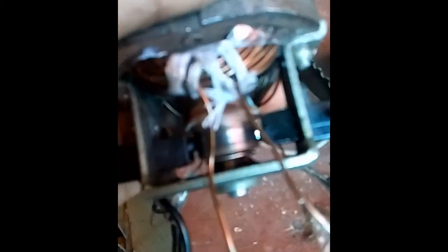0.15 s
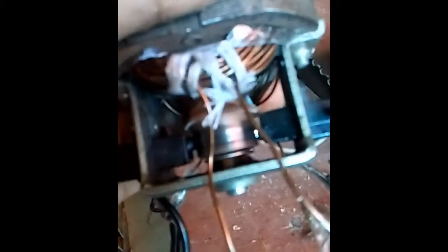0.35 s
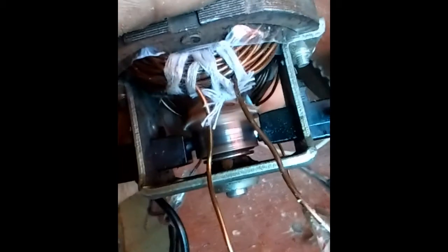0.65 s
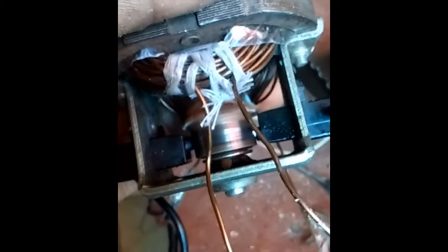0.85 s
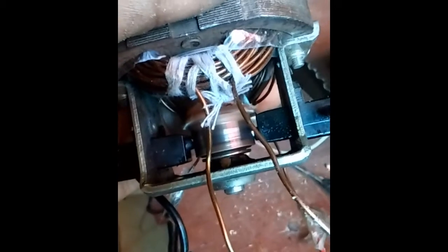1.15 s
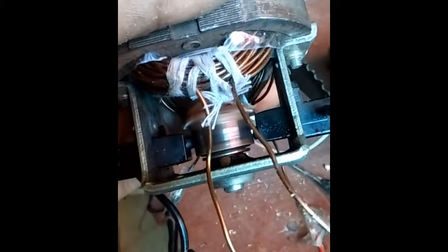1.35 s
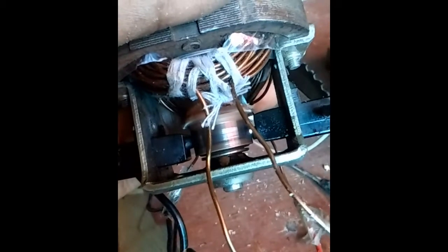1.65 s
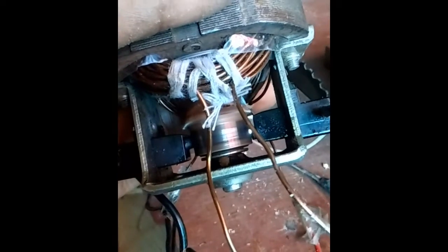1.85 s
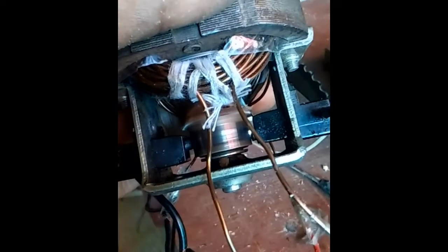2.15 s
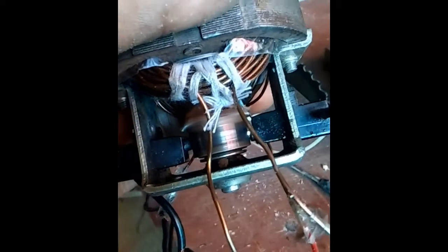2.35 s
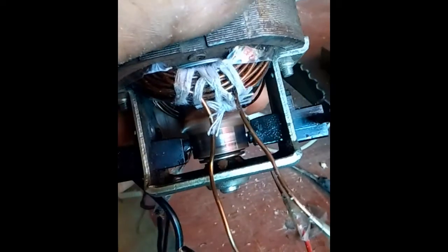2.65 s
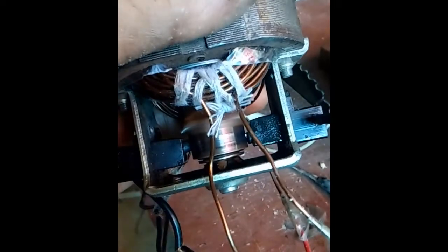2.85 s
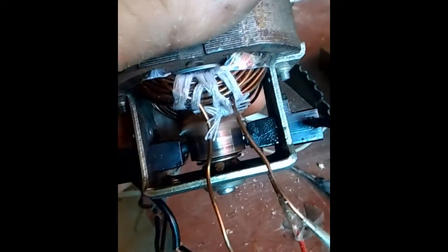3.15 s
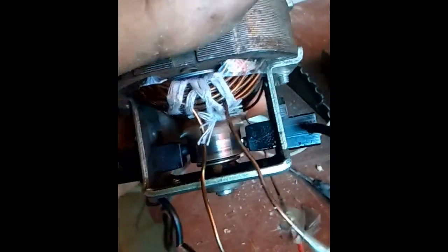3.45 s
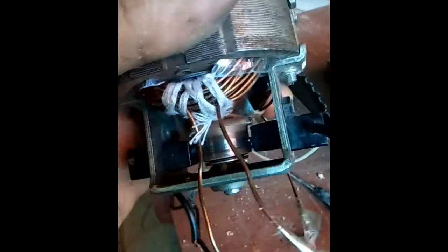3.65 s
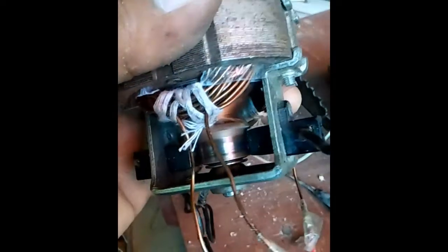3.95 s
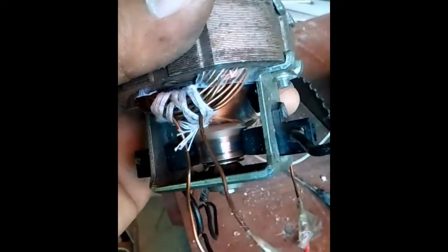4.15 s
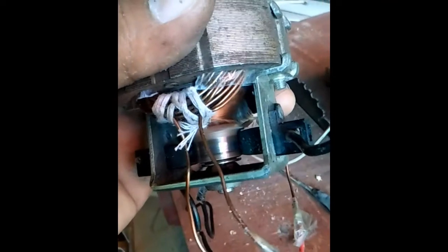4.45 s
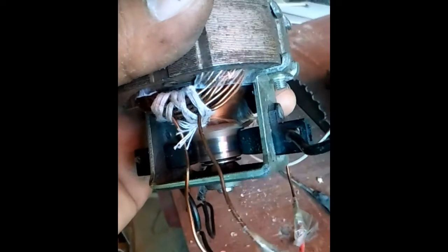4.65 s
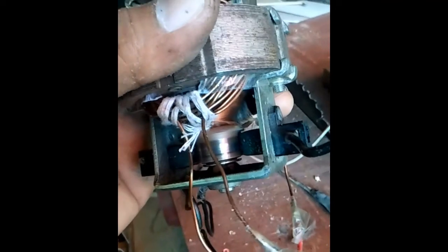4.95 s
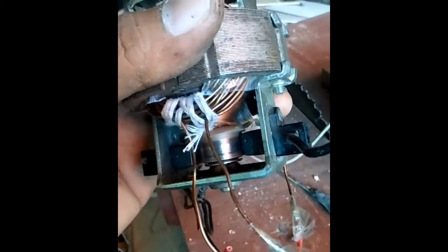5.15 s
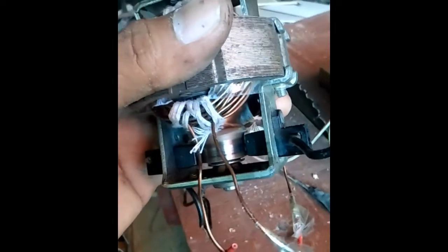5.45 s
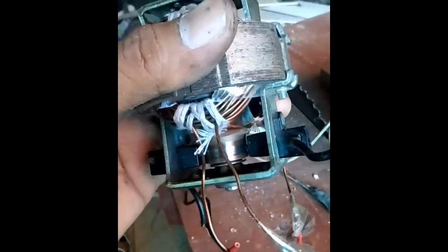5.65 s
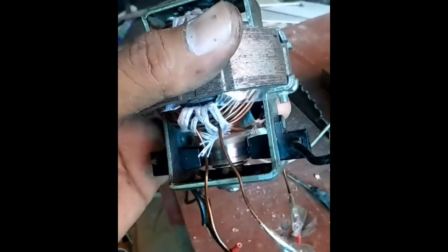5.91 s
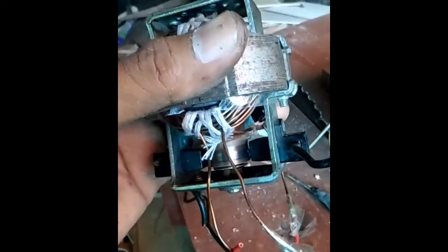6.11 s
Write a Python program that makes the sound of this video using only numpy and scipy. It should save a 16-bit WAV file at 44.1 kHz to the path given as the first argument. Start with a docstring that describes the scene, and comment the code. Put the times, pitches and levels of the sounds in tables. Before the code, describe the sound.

Close, piercing high whine of a little hand-held motor with sliding brush hiss and raspy scratching, sagging slightly then picking up speed.

```python
"""Hand-held brushed motor, close up

A small open-frame motor runs at about 5600 rpm, held in a hand close to the microphone in a quiet workshop.
Its twelve slots and the commutator under the brushes whine on multiples of the shaft speed, over a hiss of
sliding carbon, a rasp ringing the frame, soft rubs of the grip and a faint rush of bearings and air.
As the hand tilts it, the rotor drags and slows a little, then runs free, faster and rougher."""
import sys
import numpy as np
from scipy import signal
from scipy.fft import rfft, irfft
from scipy.io import wavfile
from scipy.ndimage import uniform_filter1d

SR = 44100
rng = np.random.default_rng(int(sys.argv[2]) if len(sys.argv) > 2 else 0)


def output_pcm(signal):
    """Save a mono or channel-first signal as 16-bit PCM at the path in sys.argv[1].

    Samples are clipped to [-1, 1] before scaling.
    """
    pcm = np.clip(np.atleast_2d(signal).T, -1, 1) * 32767
    wavfile.write(sys.argv[1], SR, np.round(pcm).astype(np.int16))


N = 276948
HOP = 96  # samples between control steps
TIME = np.arange(N) / SR
STEPS = np.arange(N // HOP + 2) * HOP / SR
SQUEAL_ORDER = 72  # the main squeal, as a multiple of the shaft speed

# shaft speed: t/s, f/Hz (turns per second)
SPEED = [(0.0, 93.21), (0.64, 92.68), (1.32, 92.61), (1.76, 92.24), (1.92, 92.02), (2.76, 91.43),
         (2.92, 91.05), (3.44, 90.98), (3.56, 90.78), (3.68, 90.93), (4.04, 91.94), (4.16, 92.07),
         (4.8, 93.51), (5.28, 94.34), (5.6, 94.62), (6.27, 94.75)]
# bearing and air noise coloured by the frame, rotor seated and free: f/Hz, level/dB per Hz
RUSH_SEATED = [(30, -135), (180, -110), (430, -103), (700, -105), (1750, -103), (2050, -108), (2550, -98),
               (3300, -92.5), (4850, -101), (6200, -92), (9700, -100), (10500, -112), (13800, -111)]
RUSH_FREE = [(30, -135), (180, -109), (420, -104), (1400, -107), (1800, -100), (2030, -116), (2200, -103),
             (3900, -101), (9000, -93.5), (10200, -107), (11200, -105), (13800, -116)]
# colour of the sliding hiss in the brush holders, rotor seated: f/Hz, relative level/dB per Hz
HISS_SEATED = [(4600, -41), (5400, -12), (6150, 7), (6350, -5.5), (6600, 1.5), (7000, -1), (7550, -4),
               (7800, 1.5), (8300, -9), (10000, -29)]
# how hard the carbon scratches: t/s, gain/dB
SCRATCH = [(0, -2), (1.2, 0.5), (1.7, -2.5), (3.7, 4.5), (4.149, 0.5), (4.9, 4.5), (5.5, 2), (6.28, -2)]


def amp(db):
    """Amplitude factor of a level in dB."""
    return 10 ** (np.asarray(db) / 20)


def unit(x):
    """The signal scaled to rms 1."""
    return x / np.sqrt(np.mean(abs(x) ** 2) + 1e-20)


def curves(rows, t):
    """Every column of a table at the times t."""
    s, *columns = np.transpose(rows)
    return [np.interp(t, s, column) for column in columns]


def read(points, hz):
    """A spectrum in dB at the frequencies hz, interpolated over log frequency."""
    f, db = np.transpose(points)
    return np.interp(np.log(hz + 1), np.log(np.sort(f) + 1), db)


def by_seat(seat, db):
    """A level between its values in light contact (0), dragging (1) and running free (2)."""
    return np.interp(seat, np.arange(3), db)


def wander(rate_hz):
    """Smooth chance of rms 1 at the control steps, no faster than about rate_hz."""
    hz = np.fft.rfftfreq(len(STEPS), HOP / SR)
    spectrum = rfft(rng.standard_normal(len(STEPS))) / (1 + (hz / rate_hz) ** 2)
    return unit(irfft(spectrum, len(STEPS)))


def noise(spectrum, patchy_db=3):
    """Noise of a given power per Hz; reflections from hand and bench leave slowly shifting peaks and gaps."""
    hz, _, z = signal.stft(rng.standard_normal(N), SR, nperseg=1024)
    patches = uniform_filter1d(rng.standard_normal(z.shape), size=5, axis=0)  # smooth over frequency
    patches = unit(uniform_filter1d(patches, size=40, axis=1))  # smooth over time
    depth_db = patchy_db * np.minimum(hz / 1500, 1)
    z = z * amp(read(spectrum, hz)[:, None] + depth_db[:, None] * patches)
    return np.sqrt(SR / 2) * signal.istft(z, SR, nperseg=1024)[1][:N]


def ring(drive, hz, width_hz):
    """The drive heard through one resonance of three equal poles, at rms 1."""
    offset = (np.fft.rfftfreq(N, 1 / SR) - hz) / width_hz
    return unit(irfft(rfft(drive) / (1 + 1j * offset) ** 3, N))


def rush_db(hz, free):
    """Noise density of the frame at one frequency, between seated and free."""
    return (1 - free) * read(RUSH_SEATED, hz) + free * read(RUSH_FREE, hz)


def order_levels(seat, free, bar_db=19, low_db=10, free_db=-4, holder_db=-62, scatter_db=6,
                 sway_db=1.5, sway_hz=3, count=146, full_squeal_db=-35):
    """Level in dB of every shaft order: a weak comb from unequal bars, with the strong tones standing out."""
    # tones of slots and uneven bars, by multiple of the shaft speed:
    # base level/dB in light contact, level/dB dragging, level/dB running free
    strong_tones = {10: (-87, -86, -84), 12: (-77, -83.5, -78.5), 24: (-73, -67, -74.5),
                    30: (-70, -89, -64.5), 37: (-67, -62.5, -69.5), 41: (-73, -59.5, -93),
                    42: (-60, -63, -75.5), 44: (-73.5, -76, -61), 45: (-61, -61.5, -64.5),
                    46: (-64.5, -57.5, -76), 49: (-76, -69, -62), 50: (-83, -67, -94),
                    59: (-63, -53.5, -55.5), 61: (-98, -54.5, -55), 64: (-89, -68, -82),
                    65: (-64.5, -48, -51), 66: (-59, -55, -50.5), 67: (-55.5, -43, -73),
                    69: (-71, -54.5, -61), 71: (-54, -48.5, -45), 73: (-68, -45, -42),
                    74: (-57.5, -51.5, -50.5), 75: (-49, -64, -37.5), 76: (-53, -51.5, -45.5),
                    77: (-56.5, -49, -49.5), 80: (-69, -66, -45), 81: (-68, -51.5, -51.5),
                    83: (-61, -53, -45.5), 84: (-48.5, -59.5, -55), 85: (-70, -48, -46),
                    86: (-75, -55.5, -50), 87: (-58, -55, -71), 96: (-65.5, -52.5, -60),
                    105: (-75, -57, -71), 107: (-83.5, -58.5, -71.5), 119: (-77, -74, -68.5)}
    # the main squeal: t/s, level/dB
    squeal = [(0.0, -51), (0.6, -56), (0.8, -47.5), (1.6, -36.5), (2.28, -33.5), (2.88, -34), (3.36, -33.5),
              (3.88, -37.5), (3.96, -53), (4.08, -41), (4.4, -50.5), (4.52, -37.5), (4.68, -42.5),
              (5.04, -34.5), (5.36, -33.5), (6.27, -37.5)]
    # slot tones that follow the slow rise and fall of the squeal, by multiple of the shaft speed:
    # at full squeal, level/dB in light contact, level/dB dragging, level/dB running free; follow/dB per dB
    slot_tones = {36: (-50.5, -55, -52.5, 0.44), 48: (-48.5, -53, -59, .5), 60: (-44, -47.5, -40.5, 0.66)}
    # brushes chattering on the commutator: t/s, gain/dB
    chatter = [(0, -3), (0.5, -7), (0.82, -2.5), (1.4, 5.5), (2, 2), (2.5, 1), (3.35, 3), (4.08, 1.5),
               (4.27, -1.5), (4.7, 0.5), (6.28, -0.5)]
    # tones that swell once as the motor is tilted, by multiple of the shaft speed:
    # middle t/s, time from the middle to 1/e of the dB rise/s, rise/dB
    swells = {12: (4.84, 0.57, 8.4), 24: (3.65, 0.39, 6.2), 71: (4.08, 0.65, 6.7), 73: (3.73, 0.28, 7.4),
              76: (3.83, .2, 6.1), 84: (4.08, .22, 9.6)}

    chatter_db, = curves(chatter, STEPS)
    squeal_db, = curves(squeal, STEPS)
    slow_squeal_db = uniform_filter1d(squeal_db, size=180) - full_squeal_db
    shaft_hz = np.mean(curves(SPEED, STEPS))

    strong = {k: by_seat(seat, db) + sway_db * wander(sway_hz) for k, db in strong_tones.items()}
    slots = {k: by_seat(seat, db) + follow * slow_squeal_db for k, (*db, follow) in slot_tones.items()}
    slots[SQUEAL_ORDER] = squeal_db

    levels = {}
    for k in range(1, count):
        hz = k * shaft_hz
        # a frame this small radiates the low orders poorly
        radiation_db = np.interp(hz, [0, 2400, 3500], [0, low_db, bar_db])
        weak_db = rush_db(hz, free) + radiation_db + free * free_db
        weak_db = np.maximum(weak_db, holder_db + read(HISS_SEATED, hz))
        weak_db = weak_db + scatter_db * min(hz / 2000, 1) * wander(0.37)
        # chatter is heard around the brush holders' band, but not on the slot tones or squeal
        in_holders = np.exp(-((hz - 6700) / 1700) ** 4)
        levels[k] = slots.get(k, strong.get(k, weak_db) + in_holders * chatter_db)
    for k, (middle, length, rise_db) in swells.items():
        levels[k] = levels[k] + rise_db * np.exp(-((STEPS - middle) / length) ** 2)
    return levels


def whine(angle, seat, free, flutter_seated=0.099, flutter_free=0.17, flutter_hz=45, drift=0.28,
          end_play=0.86, jitter=0.00074, shake_db=0.5):
    """Each turn repeats the same pattern of bar strikes; brush bounce makes every tone flutter."""
    flutter = flutter_seated + (flutter_free - flutter_seated) * free
    pressure_db = shake_db * wander(6.2)
    # the brushes meet the bars slightly early or late (jitter in radians of shaft angle)
    turn = np.exp(1j * (angle + jitter * np.interp(TIME, STEPS, wander(120))))
    partial, out = np.ones(N, complex), np.zeros(N)
    for k, db in order_levels(seat, free).items():
        partial *= turn
        bounce = 1 + flutter * (wander(flutter_hz) + 1j * wander(flutter_hz))
        # the main squeal swells once a turn: its nearest neighbours share its starting phase
        spread = np.pi * np.clip((abs(k - SQUEAL_ORDER) - 1) / 2, 0, 1)
        # the path to the microphone shifts slowly as the hand moves; a free rotor also floats in its bearings
        phase = spread * rng.uniform(-0.82, 1) + drift * wander(0.8) + end_play * free * wander(0.48)
        envelope = amp(db + pressure_db) * bounce * np.exp(1j * phase)
        out += (np.interp(TIME, STEPS, envelope) * partial).real
    return np.sqrt(2) * out


def brush_hiss(angle, seat, free, throb=0.52, seated_db=-2, free_db=-2, db_per_hz=1.6,
               uneven_db=-0.5, uneven_hz=4):
    """Carbon slides on copper, louder with speed, pressed harder once a turn by the eccentric commutator."""
    # colour of the hiss, rotor free: f/Hz, relative level/dB per Hz
    hiss_free = [(4800, -63), (5230, 1), (5480, -8), (5700, -6), (5980, -4), (6220, -3), (6500, 6),
                 (6880, 0.5), (7300, -2.5), (7680, -43), (8000, -32), (8500, -40)]
    # base before the trims: level/dB in light contact, level/dB dragging, level/dB running free
    base_db = (-49.5, -47.5, -46)

    shaft_hz, = curves(SPEED, STEPS)
    speed_db = db_per_hz * (shaft_hz - shaft_hz.mean())
    hiss_db = by_seat(seat, base_db) + speed_db + uneven_db * wander(uneven_hz)
    seated = amp(seated_db) * np.sqrt(1 - free) * unit(noise(HISS_SEATED))
    loose = amp(free_db) * np.sqrt(free) * unit(noise(hiss_free))
    return np.interp(TIME, STEPS, amp(hiss_db)) * unit(1 + throb * np.cos(angle)) * (seated + loose)


def rasp(angle, seat, burst_db=1.52, burst_hz=22, throb=0.41):
    """Uneven scratching of the carbon, hardest once a turn, rings the steel frame."""
    # frame resonances: f/Hz, half-width of each pole/Hz,
    # base level/dB in light contact, level/dB dragging, level/dB running free
    frame = [(868, 164, -80, -83, -78.5), (1684, 120, -73, -78, -66), (1836, 77, -66.5, -70.5, -72.5),
             (2626, 480, -62.5, -72.5, -68)]

    scratch_db, = curves(SCRATCH, STEPS)
    out = np.zeros(N)
    for hz, width_hz, *seat_db in frame:
        level_db = by_seat(seat, seat_db) + scratch_db + burst_db * wander(burst_hz)
        drive = rng.standard_normal(N) * (1 + throb * np.cos(angle))
        out += np.interp(TIME, STEPS, amp(level_db)) * ring(drive, hz, width_hz)
    return out


def handling():
    """Dull, brief rubs as the grip shifts: swells of noise through one resonance each."""
    # soft bumps of the hand on the frame:
    # middle t/s, level/dB at the middle, f/Hz, half-width of each pole/Hz, time from the middle to 1/e/s
    bumps = [(3.436, -68, 377, 89.7, 0.026), (3.836, -72, 841, 129.9, 0.065), (4.83, -74, 464, 91, .025)]

    out = np.zeros(N)
    for middle, db, hz, width_hz, length in bumps:
        swell = np.exp(-((TIME - middle) / length) ** 2)
        out += amp(db) * swell * ring(rng.standard_normal(N), hz, width_hz)
    return out


def rush(angle, free, throb=0.25, follow=0.27):
    """Steady noise of bearings and stirred air, swelling a little with the scratching."""
    scratch_db, = curves(SCRATCH, TIME)
    blend = np.sqrt(1 - free) * noise(RUSH_SEATED) + np.sqrt(free) * noise(RUSH_FREE)
    return blend * amp(follow * scratch_db) * unit(1 + throb * np.cos(angle))


def scene():
    """One shaft angle and the seat of the rotor drive all the layers of the motor."""
    # how the rotor sits: t/s, seat (0 light contact, 1 dragging, 2 running free)
    seat_points = [(0, 0), (1, 0.02), (2.5, 0.75), (3.6, 1), (4, 1.8), (6.28, 2.08)]

    shaft_hz, = curves(SPEED, TIME)
    angle = 2 * np.pi * np.cumsum(shaft_hz) / SR
    seat, = curves(seat_points, STEPS)
    free = np.clip(seat - 1, 0, 1)
    free_fine = np.interp(TIME, STEPS, free)  # the same at every sample
    motor = whine(angle, seat, free) + brush_hiss(angle, seat, free_fine)
    motor += rasp(angle, seat) + rush(angle, free_fine)
    return (motor + handling())[None]


def record(dry):
    """The recorder's band limit: a steep linear-phase low-pass at 13950 Hz."""
    lowpass = signal.firwin(1023, 13950, window=("kaiser", 9), fs=SR)
    return signal.oaconvolve(dry, lowpass[None], "same")


dry = scene()
out = record(dry)
output_pcm(out)
```